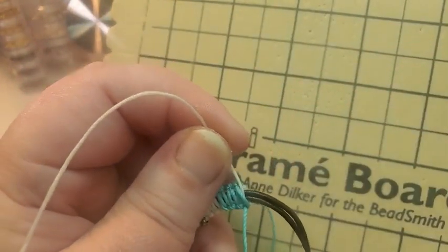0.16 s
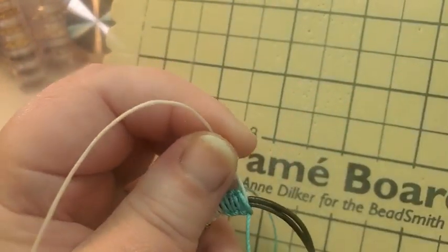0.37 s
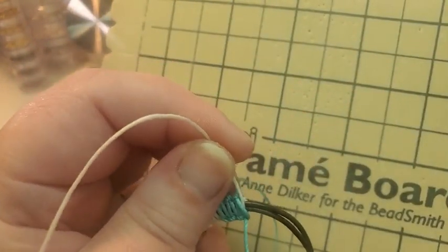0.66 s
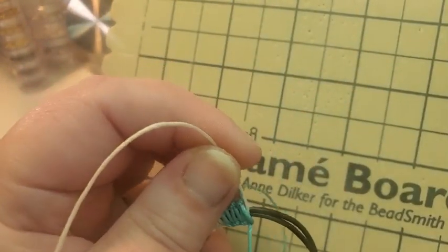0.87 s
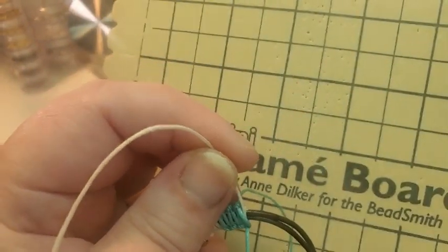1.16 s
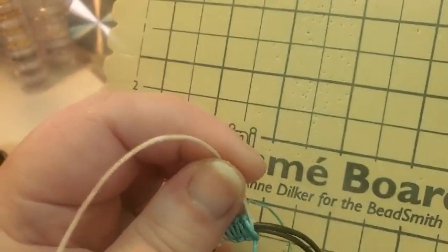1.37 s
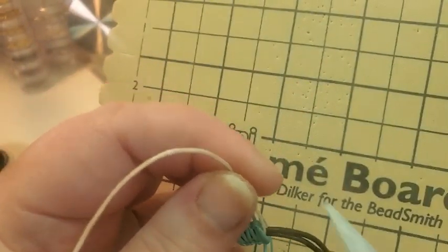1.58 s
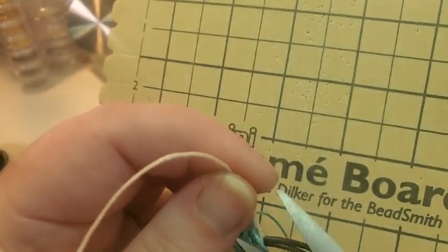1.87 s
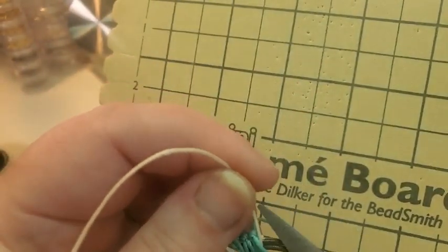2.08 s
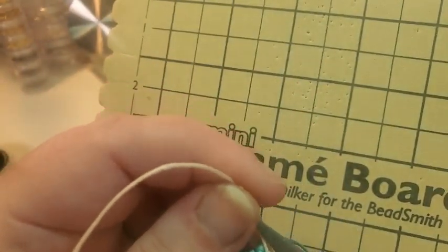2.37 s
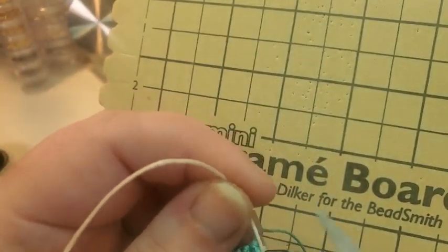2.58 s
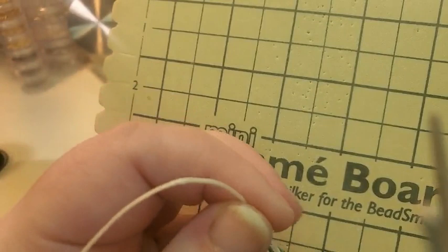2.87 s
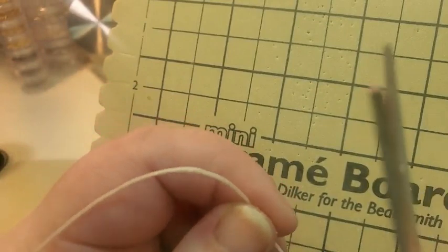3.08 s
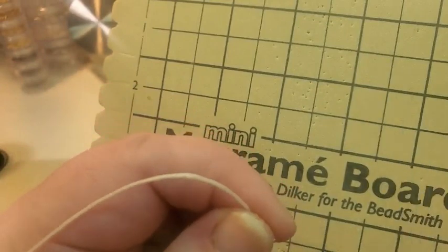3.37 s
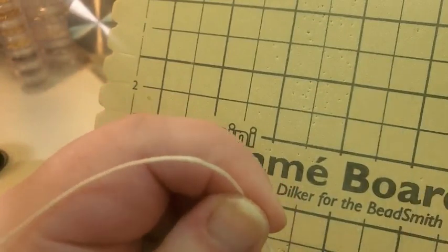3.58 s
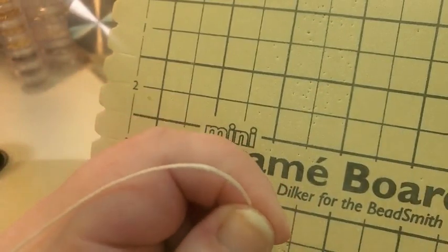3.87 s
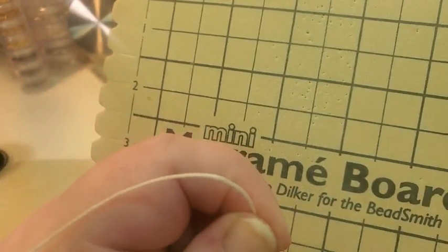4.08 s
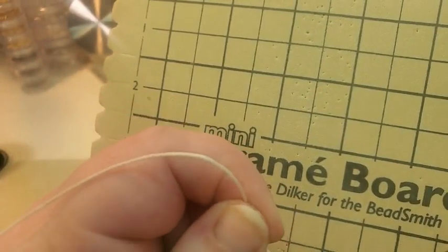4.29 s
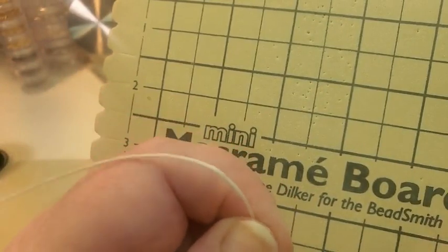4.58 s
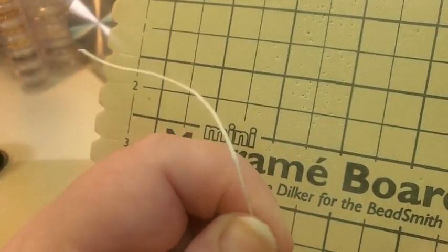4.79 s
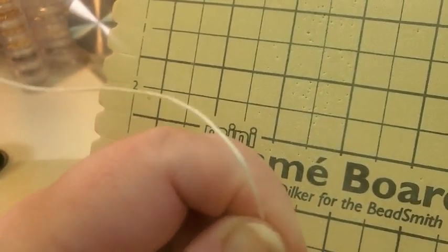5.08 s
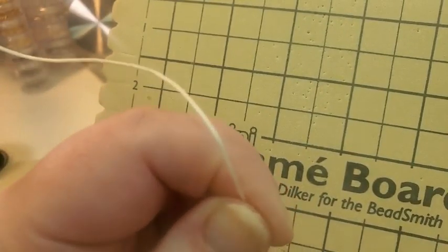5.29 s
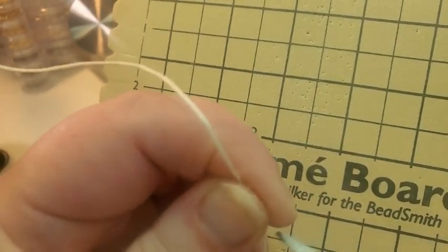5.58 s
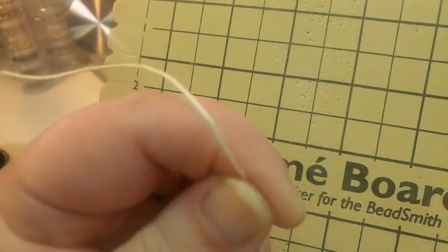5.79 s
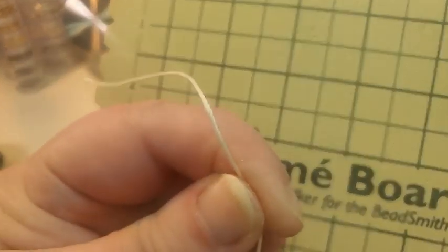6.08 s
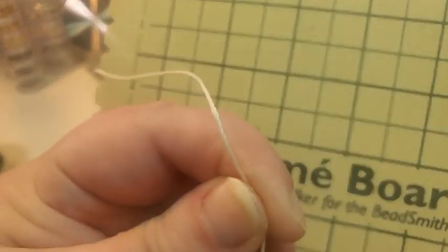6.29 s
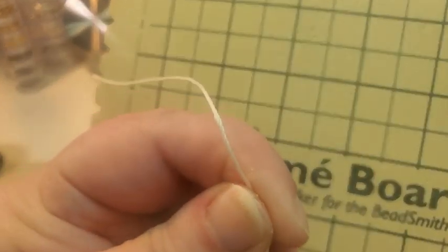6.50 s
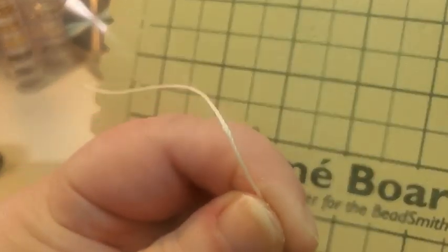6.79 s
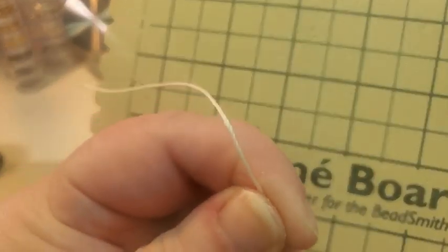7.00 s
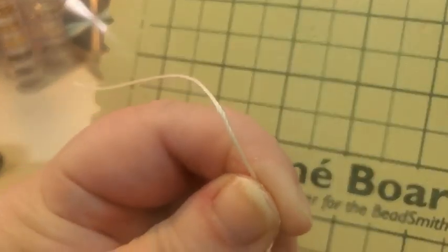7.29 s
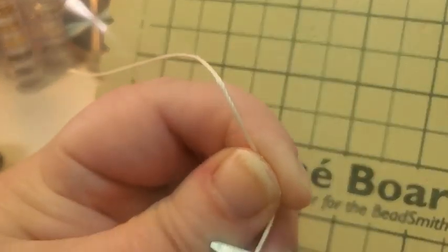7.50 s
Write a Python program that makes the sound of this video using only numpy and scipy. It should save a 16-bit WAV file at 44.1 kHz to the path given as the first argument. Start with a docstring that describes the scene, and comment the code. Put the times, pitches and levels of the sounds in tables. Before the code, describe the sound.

A steady low appliance hum, a soft rumble and faint microphone hiss fill a quiet room throughout. Close to the microphone, hands handle thread over a foam board, giving scattered soft rubs and dull little knocks. At about 1.3 seconds, slightly to the right, scissors slide and clack on the table, then clack again at 1.7 seconds, each time with a brief ring of the blades. Faint rubs follow. From about 3 to 4.5 seconds come light ticks and short slides, with small pivot squeaks near 3.2 seconds. Around 4.6 to 4.8 seconds the scissors scrape and knock more loudly on the table top. At 5.3 to 5.5 seconds there is a cluster of sharp, bright clicks and a quick squeak of the pivot. After a faint slide at 6 seconds, only soft thread rubs and bumps continue until about 7.5 seconds.

```python
"""Thread and scissors at a table

Close to a small camera's microphone, hands work a thread over a foam board: soft rubs, dull knocks.
To the right, scissors are lifted, slid and put down. Their taps and scrapes ring in the table top,
the pivot squeaks, and hard blows ring the blades. Behind them, in a quiet room, an appliance hums
on the mains over low rumble and microphone hiss."""
import sys
import numpy as np
from scipy import signal
from scipy.fft import rfft, irfft, next_fast_len
from scipy.io import wavfile
from scipy.ndimage import uniform_filter1d, map_coordinates

SR = 44100
rng = np.random.default_rng(int(sys.argv[2]) if len(sys.argv) > 2 else 0)


def master(y):
    """Save y as 16-bit WAV."""
    cut = np.clip(np.atleast_2d(y).T, -1, 1)
    pcm = np.round(cut * 32767)  # scale
    wavfile.write(sys.argv[1], SR, pcm.astype(np.int16))


N = 337320

# rumble of the house: frequency_hz, relative_density_db
RUMBLE_SPECTRUM = [(12, -40), (20, -12.5), (30, -10.5), (39, -12.5), (50, -10), (65, -1), (91, -11.5),
                   (130, -10.5), (147, -16.5), (204, -23), (236, -14), (266, -23), (370, -24), (700, -37),
                   (1500, -120)]
# hiss of the microphone: frequency_hz, relative_density_db
HISS_SPECTRUM = [(500, -18.5), (700, -1.5), (960, 2), (1300, -1.5), (2000, -6), (3000, -7), (4000, -7),
                 (5200, -11), (7500, -10.5), (16000, -13.5)]
# likeness of left and right in rumble and hiss: frequency_hz, correlation
NOISE_CORRELATION = [(60, 0.67), (180, 0.89), (550, -0.38), (1650, -0.43), (4970, -0.1), (15000, 0.11)]
# hum of the appliance: pitch_hz, rms_db
HUM_TONES = [(119.5, -60.5), (239, -80), (360, -83), (958, -85), (1915, -91.5), (2880, -93.5)]
# decay of the room: frequency_hz, t60_s
ROOM_DECAY = [(300, .24), (2000, .22), (6000, .18), (14000, .07)]
# response of the microphone: frequency_hz, gain_db
MIC_RESPONSE = [(7400, -1), (8200, -13), (9500, -12.5), (11000, -7), (13000, -2.5), (15500, -0.5)]
# shading between the microphone ports, to which each pan_db adds: frequency_hz, left_over_right_db
PORT_SHADING = [(450, -7), (850, -12), (1300, -4.5), (2400, 1.5), (5000, 2.5), (15000, -1.5)]
# modes of the table top: pitch_hz, gain_db
TABLE_MODES = [(660, -15), (750, -8), (860, 7), (910, -4), (985, 0), (1075, -4), (1120, -1), (1285, -2),
               (1450, -11), (1600, 5), (1720, -5), (1860, -4), (2000, -5), (2210, 2), (2350, -4),
               (2510, -1), (2820, -3), (3140, 0), (3270, 2), (3450, -6), (3650, -1), (3820, -1), (4200, -8),
               (4380, -3), (4690, -2), (4870, -3), (5170, -2), (5500, -4), (5900, -6), (6250, -7),
               (6650, -7), (7100, -9), (7550, -4), (7900, -1), (8350, -4)]
# modes of the foam board: pitch_hz, gain_db
BOARD_MODES = [(315, 11), (420, 7), (520, 1.5)]
# modes of the blades: pitch_hz, gain_db, t60_s
BLADE_MODES = [(2150, -9, .25), (2215, -1, .25), (2285, 0, .27), (2590, -8, .14), (3140, -8, .14),
               (3780, -9, .12)]
# response of the scissors' pivot: frequency_hz, gain_db
PIVOT_RESPONSE = [(500, -20), (1200, -7), (2400, 0), (3600, -2), (4700, -1), (6000, -12), (8500, -28),
                  (11000, -28), (16000, -28)]
# soft rubs of fingers and thread: time_s, peak_db, centre_hz, pan_db
THREAD_RUBS = [(.329, -69, 770, 25), (1.506, -49, 1756, -9.5), (1.918, -66, 875, 12), (1.962, -70, 870, 13),
               (2.01, -60.5, 870, -0.5), (2.136, -66, 900, 1.5), (2.718, -62, 1900, 0),
               (2.948, -62, 1940, 6.5), (3.027, -57.5, 1860, -4), (3.06, -48.5, 1450, -6.5),
               (3.09, -55.5, 1530, 0), (3.17, -51, 3930, -3), (3.172, -54.5, 1800, -3),
               (3.378, -62, 863, -7), (3.647, -63, 1580, -16), (4.016, -63, 2000, -3),
               (4.078, -66.5, 1700, -11), (4.865, -47, 1330, -1), (4.97, -50, 2000, -7),
               (5.036, -48, 1900, 8), (5.176, -59, 1650, 0), (5.74, -64.5, 884, -1), (5.797, -62, 1816, -6),
               (6.076, -55, 1020, 3), (6.105, -67, 1490, -1), (6.198, -65, 1950, -9.5),
               (6.597, -53.5, 1610, -3), (7.158, -63.5, 1570, -15), (7.35, -58, 1350, -36),
               (7.445, -48, 1040, 1.5)]
# dull knocks of the hand on the board: time_s, peak_db, centre_hz, pan_db
HAND_KNOCKS = [(.372, -62, 456, -3), (1.303, -56, 350, -3), (1.657, -59, 380, -3), (2.09, -49.5, 300, -2),
               (2.716, -55, 266, 6), (3.032, -52, 320, 3), (3.524, -62, 490, -12), (6.075, -51.5, 437, 14),
               (7.378, -59, 270, 1)]
# squeaks at the pivot: start_s, rise_s, hold_s, fall_s, first_slip_hz, last_slip_hz, peak_db
PIVOT_SQUEAKS = [(3.155, .022, .004, .03, 2300, 3050, -50), (3.31, .021, .002, .016, 900, 900, -43),
                 (5.394, .013, .005, .005, 1620, 1850, -35), (5.404, .014, .018, .034, 1050, 1530, -35),
                 (5.437, .006, .003, .014, 15800, 11200, -36), (5.5, .022, .008, .03, 10700, 14300, -72)]
# blows that ring the blades: start_s, peak_db
BLADE_BLOWS = [(1.306, -43.5), (1.66, -37), (1.707, -51)]
# scissors sliding on the table: start_s, rise_s, hold_s, fall_s, low_ring_db, bright_over_low_db,
# hiss_over_low_db, low_centre_hz, low_spread_octaves, bright_centre_hz
SCISSOR_SCRAPES = [(1.196, 0.013, 0.16, .02, -65.5, -4.5, -6, 1520, 0.31, 4200),
                   (1.279, 0.022, 0.0034, 0.036, -39, -1.5, -8, 1715, 0.6, 4150),
                   (1.309, 0.0083, 0.016, 0.042, -53.5, -6, 6, 1840, 0.34, 4340),
                   (1.635, 0.019, 0.013, 0.03, -42, -9, -33, 1920, 0.42, 3760),
                   (1.88, 0.02, 0.18, .03, -76.5, -13, -26, 1140, 0.63, 2000),
                   (2.0, 0.016, 0.15, 0.044, -76, -16, -27, 1210, .6, 2000),
                   (2.699, 0.026, 0.11, 0.032, -80, -11, -24, 1580, .5, 2200),
                   (3.142, .03, 0.15, .04, -75.5, -2, -14, 1740, 0.54, 4200),
                   (3.268, 0.034, 0.028, 0.052, -58.5, 6.5, -3.5, 1720, 0.61, 4020),
                   (3.499, 0.018, 0.066, .035, -64, -19, -32, 1640, 0.67, 2400),
                   (3.785, 0.015, 0.024, 0.12, -71, -2.5, -0.5, 1560, 0.54, 5630),
                   (3.917, 0.024, 0.0068, 0.03, -63, 6.5, -3, 1950, 0.41, 3850),
                   (4.139, 0.024, .006, 0.055, -77.5, 6, 16, 2000, 0.77, 5500),
                   (4.427, 0.039, 0.0079, 0.075, -62.5, -4.5, -1.5, 1650, 1.2, 4070),
                   (4.615, 0.078, 0.032, 0.057, -37, -6, -33, 1140, 0.62, 2840),
                   (4.712, 0.029, 0.013, 0.04, -34, -6, -28, 1330, 1.1, 3230),
                   (4.897, .015, 0.023, 0.033, -76.5, 0.5, 0, 1600, 0.67, 4330),
                   (5.005, 0.022, 0.0027, 0.087, -51.5, -12.5, -8.5, 1740, 0.88, 4100),
                   (5.303, 0.013, 0.016, 0.036, -53.5, 1.5, -3, 2260, 0.76, 4370),
                   (5.388, 0.016, 0.023, 0.021, -44, 3.5, -5.5, 2400, 0.73, 4650),
                   (5.415, 0.015, 0.02, 0.024, -60.5, 15.5, 22, 2380, 0.85, 5230),
                   (5.456, 0.018, 0.058, 0.039, -84.5, -9, 20.5, 1700, .8, 4600),
                   (5.993, 0.03, 0.024, 0.049, -56.5, -15.5, -31, 1920, 0.54, 3170)]
# sharp taps on the table: start_s, ring_peak_db, centre_hz, spread_octaves, treble_over_ring_db, pan_db
SCISSOR_TAPS = [(1.211, -59, 4000, 0.33, -13, 12), (1.251, -45, 4030, 0.48, -29.5, -9),
                (1.296, -37, 4000, 0.33, -28, -11), (1.302, -27, 4100, 0.48, -32, 11),
                (1.304, -22.5, 1900, 0.3, -32, -3), (1.311, -36, 4360, 0.2, -28, -6),
                (1.656, -20, 1820, 0.83, -40, -5), (1.657, -35, 6800, 0.5, -27, -4.5),
                (1.659, -18, 1900, 0.38, -48, -7), (1.66, -36, 880, 0.14, -51, -7.5),
                (1.667, -32.5, 1840, 0.32, -54, 5), (1.682, -39, 2300, 0.41, -46, -3),
                (1.69, -39.5, 2190, 0.33, -40, 9), (2.579, -58.5, 5370, 0.58, 8, -9),
                (2.776, -59.5, 1160, 0.21, -25, -1), (2.82, -57, 1690, 0.4, -33, -4.5),
                (3.078, -42, 1030, 0.39, -35, 0), (3.198, -51.5, 4120, 0.19, -27, -1),
                (3.224, -56, 4200, 0.31, -32, -1), (3.245, -62, 4440, 0.24, -24, 8),
                (3.273, -52, 4400, 0.31, -25, 1), (3.297, -60, 7600, .3, -20, -2),
                (3.327, -45, 3700, 0.16, -30, 7), (3.352, -40, 2980, 0.97, -18, -3),
                (3.693, -56.5, 1595, 0.38, -28, -5), (3.945, -39, 3840, 0.22, -12, -5),
                (3.959, -70, 3000, .3, -27, 5), (4.053, -60, 2500, 0.9, 3, -7),
                (4.067, -64, 4300, 0.28, -7, -7), (4.08, -59.5, 4000, .6, 3, -9),
                (4.088, -66, 4300, .25, -10, -7), (4.164, -39, 6640, 0.59, -1.5, -6),
                (4.391, -54.5, 6100, 0.5, 5, -16), (4.45, -51.5, 2400, 0.77, -20, -7),
                (4.621, -52.5, 900, 0.44, -38, 2), (4.661, -44, 1900, 0.88, -40, 13),
                (4.701, -33, 1490, 0.76, -44, 8), (4.749, -28, 1280, 1.3, -47, 11),
                (4.755, -27, 1280, 0.77, -44, -6), (4.762, -27.5, 1510, 0.86, -52, 15),
                (4.984, -52, 5000, 1.3, 6, -10), (5.017, -49, 5000, 1.4, 3, -16),
                (5.318, -30.5, 4730, 0.22, -41, 6), (5.323, -23, 4420, 0.33, -9.5, -8.5),
                (5.326, -42.5, 1880, 0.87, -30, 4), (5.333, -34.5, 4450, 0.43, -11, 3),
                (5.4, -34.5, 4700, 0.24, -22, -2), (5.407, -34, 4700, 0.31, -20, 0),
                (5.416, -26, 4800, 0.25, -20, -4)]


def amp(db):
    return 10 ** (np.asarray(db) / 20)


def unit_rms(x):
    return x / np.sqrt(np.mean(x ** 2) + 1e-20)


def curve_at(points, hz):
    """Reads (frequency_hz, value) points along a log frequency axis."""
    frequencies, values = np.transpose(points)
    return np.interp(np.log(hz + 1), np.log(frequencies + 1), values)


def filtered(x, response):
    """Passes x through a complex response of frequency."""
    size = next_fast_len(x.shape[-1] + SR // 12)
    return irfft(rfft(x, size) * response(np.fft.rfftfreq(size, 1 / SR)), size)[..., :x.shape[-1]]


def wobble(rate_hz):
    """A smooth random curve with rate_hz knots a second."""
    knots = rng.standard_normal(int(N * rate_hz / SR) + 4)
    return map_coordinates(knots, [np.arange(N) * rate_hz / SR])


def add(out, start_s, x, peak_db):
    """Mixes x in with the mean of its channels peaking at peak_db."""
    out[:, round(start_s * SR):][:, :x.shape[1]] += amp(peak_db) * x / np.abs(x.mean(0)).max()


def stereo_noise(spectrum):
    """Noise of rms 1 whose left-right likeness varies with frequency."""
    def mid_and_side(hz):
        angle = np.arccos(np.clip(curve_at(NOISE_CORRELATION, hz), -1, 1)) / 2
        return amp(curve_at(spectrum, hz)) * [np.cos(angle), np.sin(angle)]
    mid, side = filtered(rng.standard_normal((2, N)), mid_and_side)
    return unit_rms(np.array([mid + side, mid - side]))


def rumble_and_hiss():
    """The house rumbles and the microphone hisses, each wavering a little in level."""
    rumble = amp(-58.5 + 1.1 * wobble(2.9)) * stereo_noise(RUMBLE_SPECTRUM) * amp([[-.7], [.7]])
    hiss = amp(-69 + .7 * wobble(3)) * stereo_noise(HISS_SPECTRUM) * amp([[-1], [1]])
    return rumble + hiss


def appliance_hum():
    """Multiples of the mains buzz in the background, slightly unsteady in level and phase."""
    tones, t = np.zeros(N), np.arange(N) / SR
    for hz, rms_db in HUM_TONES:
        peak = np.sqrt(2) * amp(rms_db + .74 * wobble(9.9))
        drift = .23 * wobble(4) * hz ** .364
        tones += peak * np.sin(2 * np.pi * hz * t + drift)
    return tones * amp([[-.3], [.3]])


def room_reverb(x):
    """The room answers 200 samples late with a short tail whose treble dies first."""
    hz, t, noise = signal.stft(rng.standard_normal((2, SR // 2)), SR, nperseg=256)
    decay = amp(-60 * t / curve_at(ROOM_DECAY, hz)[:, None])
    tail = signal.istft(noise * decay, SR, nperseg=256)[1]
    delayed = np.pad(x, ((0, 0), (200, 0)))
    return signal.fftconvolve(delayed, tail / np.linalg.norm(tail[0]), axes=1)[:, :N]


def mic_ports(hz, pan_db, left_lag_s=20 / SR):
    """The left port hears the table later than the right, and differently shaded."""
    left_gain = amp((curve_at(PORT_SHADING, hz) + pan_db) / 2)
    return np.array([left_gain * np.exp(-2j * np.pi * hz * left_lag_s), 1 / left_gain])


def surface_ring(centre_hz, octaves, pan_db, modes=TABLE_MODES, q=40, spot_db=2):
    """Response of a surface's modes near centre_hz; each spot stirs them at other strengths."""
    mode_hz, mode_db = np.transpose(modes)[..., None]
    count = len(modes)
    width_hz = 9 + mode_hz / q  # hands and board damp every mode by a further 9 Hz
    spot_scatter_db = spot_db * rng.standard_normal(count)
    port_scatter_db = 3 * rng.standard_normal((2, count))
    gains = amp(mode_db.T + spot_scatter_db + port_scatter_db) * (-1) ** np.arange(count)

    def response(hz):
        band = amp(-6 * (np.log2((hz + 1) / centre_hz) / np.clip(octaves, .2, 2)) ** 2)
        low_cut = 1 / (1 + (.8 * mode_hz.min() / (hz + 1)) ** 8)  # little sounds under the lowest mode
        resonances = 1j * hz * width_hz / (mode_hz ** 2 - hz ** 2 + 1j * hz * width_hz)
        return mic_ports(hz, pan_db) * band * low_cut * (gains @ resonances)
    return response


def contact_treble(pan_db):
    """Response for the contact itself, heard above the modes; the air takes a little off the top."""
    def response(hz):
        high_pass = (1j * hz / 5000) ** 2 / (1 + 1j * hz / 5000) ** 2
        air_loss = 1 / (1 + 1j * hz / 9000)
        return mic_ports(hz, pan_db) * high_pass * air_loss
    return response


def grit(count, spread_db):
    """Rough contact force: noise in uneven grains of about half a millisecond."""
    noise = rng.standard_normal(count)
    grains = np.repeat(rng.standard_normal(count // 20 + 1), 20)[:count]
    return noise * amp(spread_db * grains)


def stroke(t, rise_s, hold_s, fall_s, edge_db=-28.5):
    """Gain of a movement: it swells, holds and fades at steady dB rates, then stops."""
    corners_s = np.cumsum([0, rise_s + 1e-4, hold_s + 1e-4, fall_s + 1e-4])
    return amp(np.interp(t, corners_s, [edge_db, 0, 0, edge_db], left=-140, right=-140))


def hand_contacts(contacts, modes, q, swell_s):
    """Soft pushes of hand or thread swell and fade, stirring a few modes of the surface."""
    out, t = np.zeros((2, N + SR)), np.arange(SR // 6) / SR
    for time_s, peak_db, centre_hz, pan_db in contacts:
        octaves = .24 + .012 * (peak_db + 65)  # a fainter contact stirs fewer modes
        force = (t / swell_s) ** 2 * np.exp(-t / swell_s) * grit(len(t), spread_db=6.5)
        ring = filtered(force, surface_ring(centre_hz, octaves, pan_db, modes, q))
        add(out, time_s - swell_s, ring, peak_db)
    return out[:, :N]


def pivot_squeaks():
    """The blades stick and slip at a gliding, shaky rate whose multiples sound through the pivot."""
    out, harmonics = np.zeros((2, N)), np.arange(1, 11)[:, None]
    for start_s, rise_s, hold_s, fall_s, first_hz, last_hz, peak_db in PIVOT_SQUEAKS:
        t = np.arange(0, rise_s + hold_s + fall_s, 1 / SR)
        shake = 1 + .22 * uniform_filter1d(rng.standard_normal(len(t)), size=90)
        slip_hz = np.linspace(first_hz, last_hz, len(t)) * shake
        partial_hz = harmonics * slip_hz
        gains = amp(curve_at(PIVOT_RESPONSE, partial_hz)) * (partial_hz < SR / 2)
        cycles = harmonics * np.cumsum(slip_hz) / SR + rng.random(harmonics.shape)
        tone = (gains * np.sin(2 * np.pi * cycles)).sum(0)
        add(out, start_s, tone * stroke(t, rise_s, hold_s, fall_s) * amp([[-3], [3]]), peak_db)
    return out


def blade_rings(attack_s=.002):
    """Hard blows leave the blades ringing; their close modes beat."""
    out, t = np.zeros((2, N + SR)), np.arange(SR // 2) / SR
    for start_s, peak_db in BLADE_BLOWS:
        ring = np.zeros((2, len(t)))
        for hz, gain_db, t60_s in BLADE_MODES:
            phase = 2 * np.pi * (hz * t + rng.random((2, 1)))
            drift = 9 * np.cumsum(rng.standard_normal(len(t))) / np.sqrt(SR)  # about 9 radians in 1 s
            ring += amp(gain_db - 60 * t / t60_s) * np.sin(phase + drift)
        add(out, start_s, ring * (1 - np.exp(-t / attack_s)) * amp([[-2], [2]]), peak_db)
    return out[:, :N]


def scissor_scrapes():
    """Steel slides on the table, right of the microphone: grit drives low modes, high modes and hiss."""
    out, t = np.zeros((2, N + SR)), np.arange(SR // 4) / SR
    for (start_s, rise_s, hold_s, fall_s, low_db, bright_db, hiss_db,
         low_hz, octaves, bright_hz) in SCISSOR_SCRAPES:
        low = surface_ring(low_hz, octaves, pan_db=-4.5, spot_db=2.5)
        bright = surface_ring(bright_hz, octaves=.52, pan_db=-13.5, spot_db=2.5)
        hiss = contact_treble(pan_db=-8)
        envelope = stroke(t, rise_s, hold_s, fall_s)
        for level_db, response in ((low_db, low), (low_db + bright_db, bright), (low_db + hiss_db, hiss)):
            force = grit(len(t), spread_db=1.5)
            steady_rms = np.std(filtered(force, response).mean(0))
            scrape = filtered(force * envelope, response) / steady_rms
            out[:, round(start_s * SR):][:, :len(t)] += amp(level_db) * scrape
    return out[:, :N]


def scissor_taps(rise_s=.0012, decay_s=.001):
    """Close by, a short rough push rings the table top and leaves a tick of treble."""
    out, t = np.zeros((2, N + SR)), np.arange(SR // 8) / SR
    for start_s, peak_db, centre_hz, octaves, treble_db, pan_db in SCISSOR_TAPS:
        force = (1 - np.exp(-t / rise_s)) * np.exp(-t / decay_s) * grit(len(t), spread_db=-3.5)
        table_top = surface_ring(centre_hz, octaves, pan_db, q=29)  # the resting tool damps the modes
        add(out, start_s, filtered(force, table_top), peak_db)
        add(out, start_s, filtered(force, contact_treble(pan_db)), peak_db + treble_db)
    return out[:, :N]


def scene():
    """Scissors and hands up close, a little room around them, hum and noise behind."""
    close = scissor_taps() + blade_rings()
    close += hand_contacts(THREAD_RUBS, TABLE_MODES, q=40, swell_s=.0073)
    close += hand_contacts(HAND_KNOCKS, BOARD_MODES, q=9, swell_s=.00463)
    close += scissor_scrapes() + pivot_squeaks()
    return close + amp(-17) * room_reverb(close) + appliance_hum() + rumble_and_hiss()


def record(dry):
    """The sound dips near 9 kHz and has no treble above 16 kHz."""
    band_limit = lambda hz: np.clip((16000 - hz) / 500, 0, 1) ** 2
    return filtered(dry, lambda hz: amp(curve_at(MIC_RESPONSE, hz)) * band_limit(hz))


dry = scene()
out = record(dry)
master(out)
```